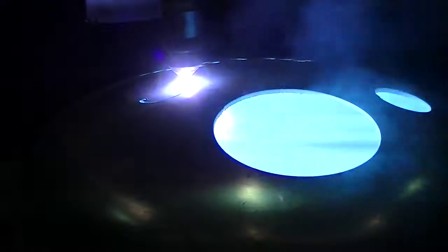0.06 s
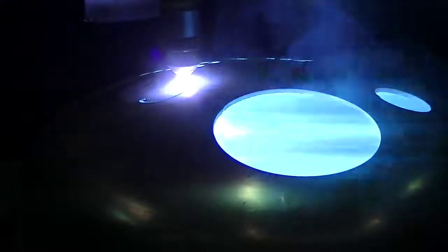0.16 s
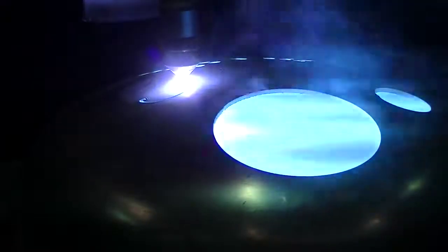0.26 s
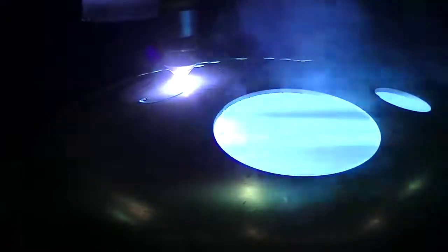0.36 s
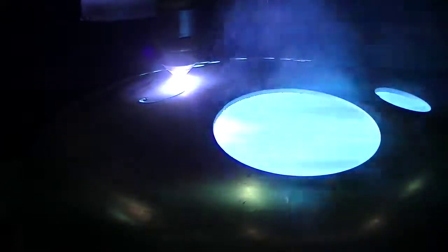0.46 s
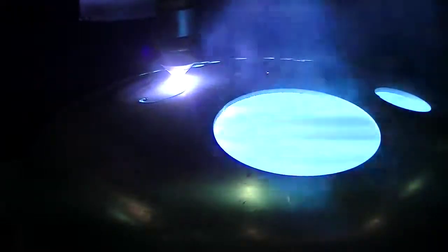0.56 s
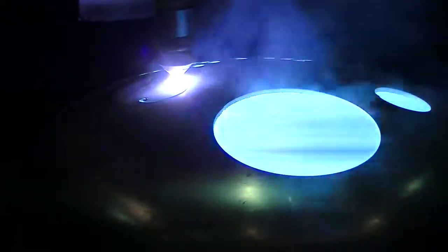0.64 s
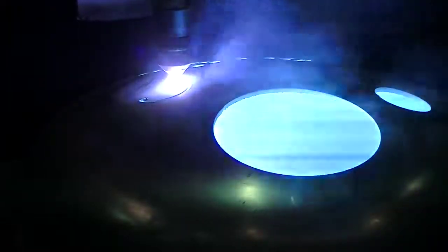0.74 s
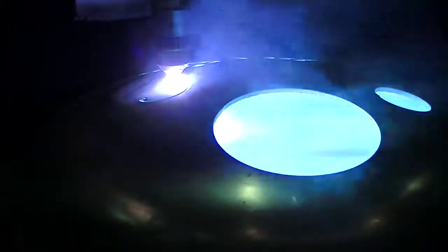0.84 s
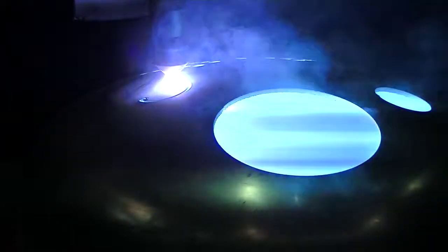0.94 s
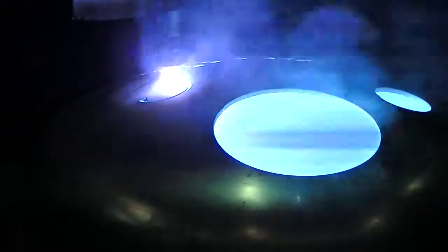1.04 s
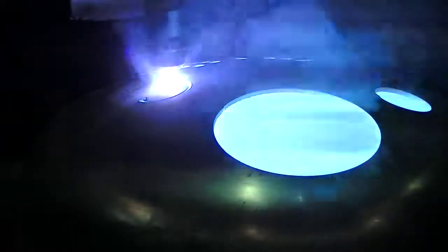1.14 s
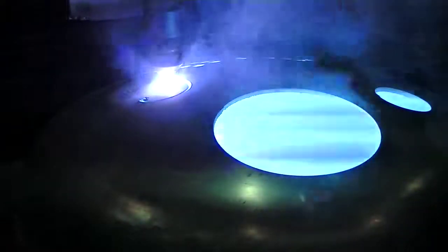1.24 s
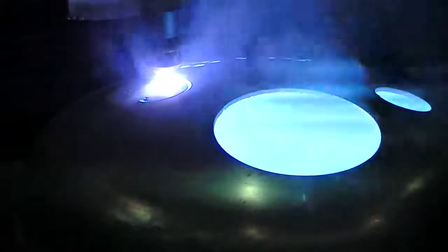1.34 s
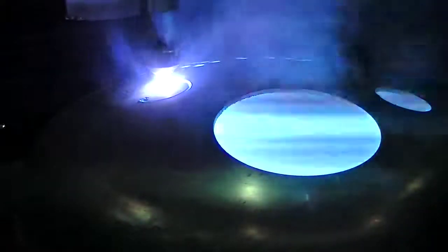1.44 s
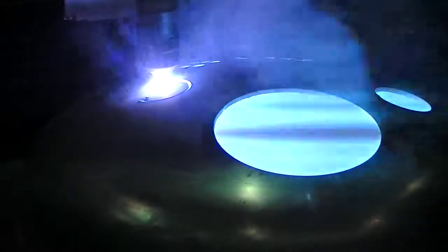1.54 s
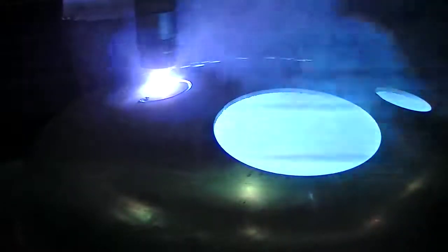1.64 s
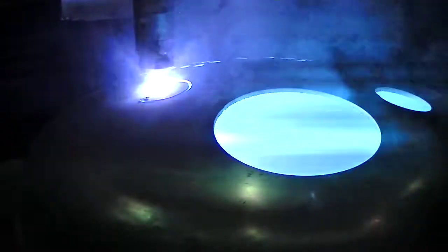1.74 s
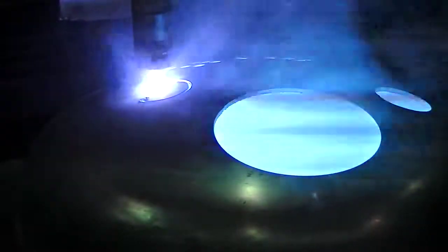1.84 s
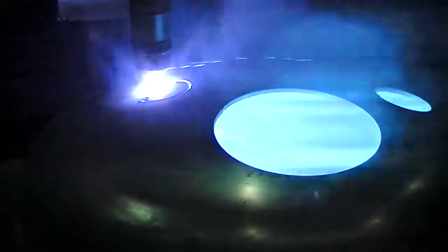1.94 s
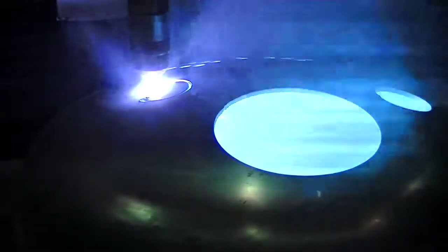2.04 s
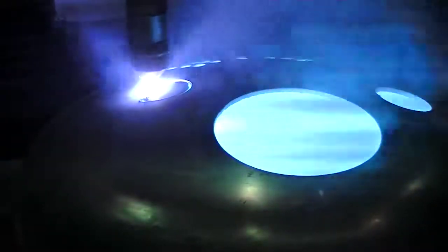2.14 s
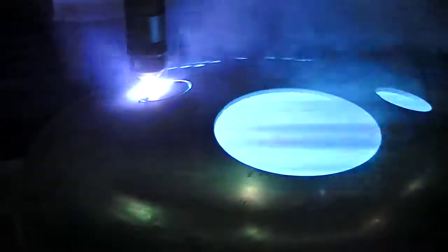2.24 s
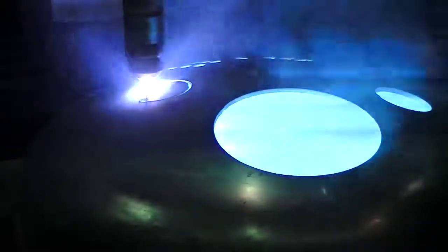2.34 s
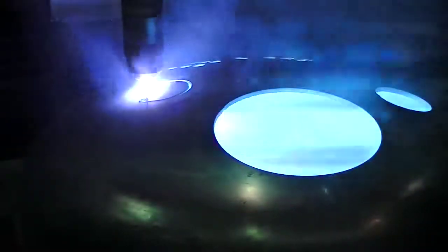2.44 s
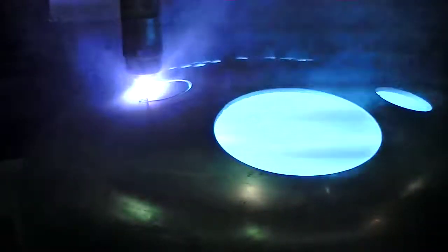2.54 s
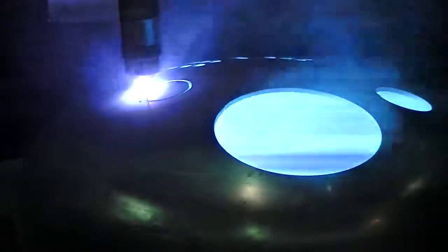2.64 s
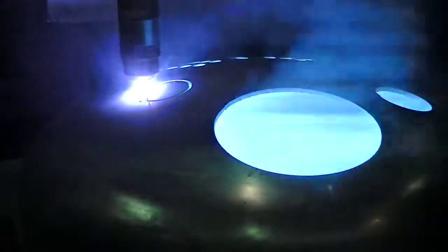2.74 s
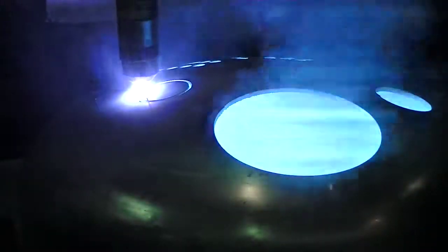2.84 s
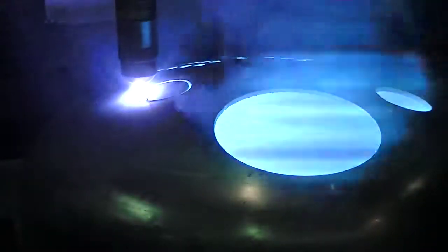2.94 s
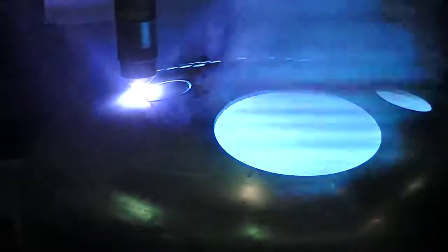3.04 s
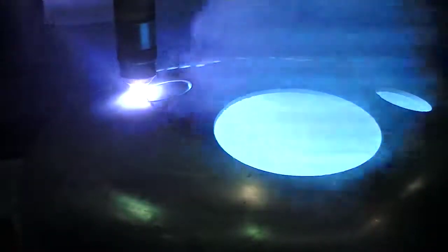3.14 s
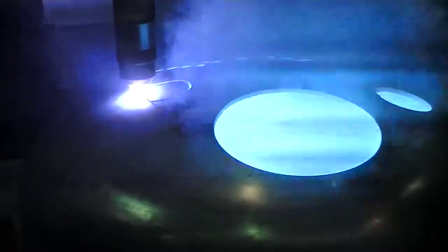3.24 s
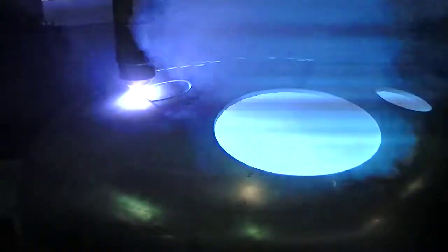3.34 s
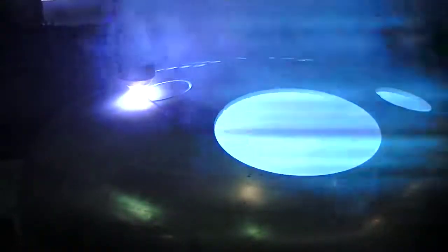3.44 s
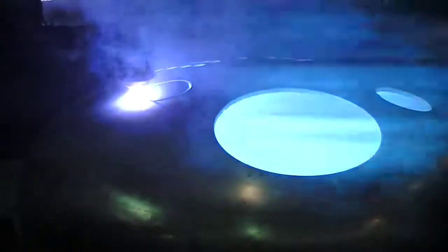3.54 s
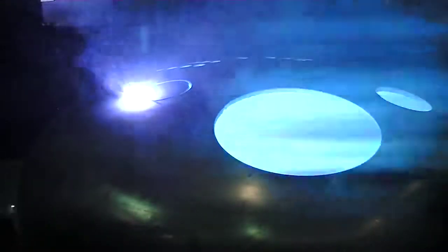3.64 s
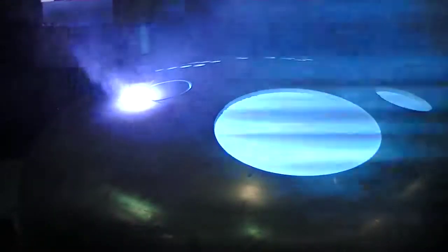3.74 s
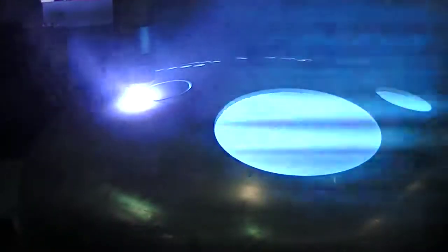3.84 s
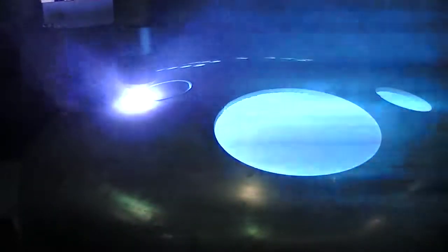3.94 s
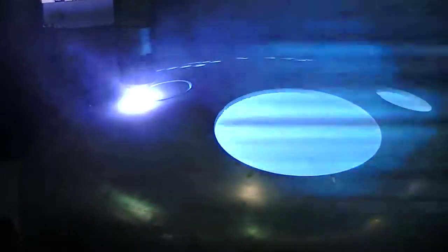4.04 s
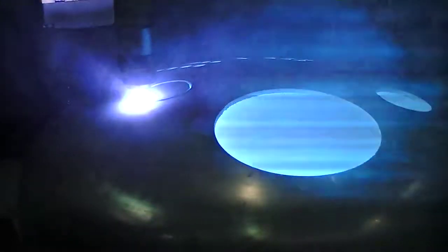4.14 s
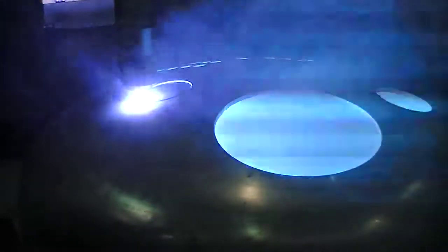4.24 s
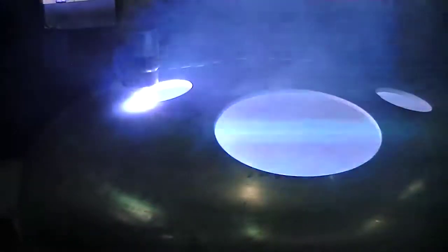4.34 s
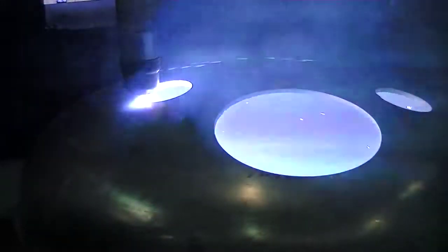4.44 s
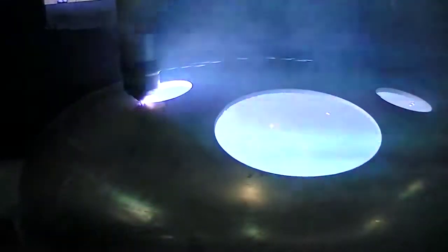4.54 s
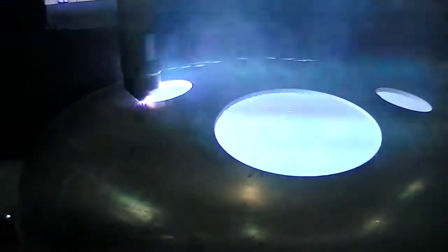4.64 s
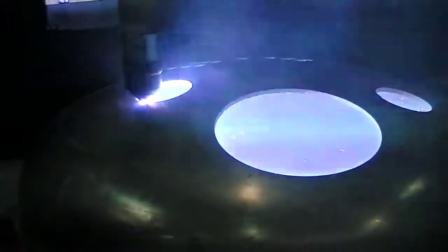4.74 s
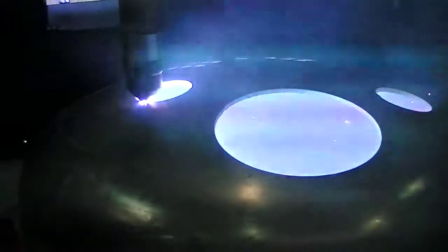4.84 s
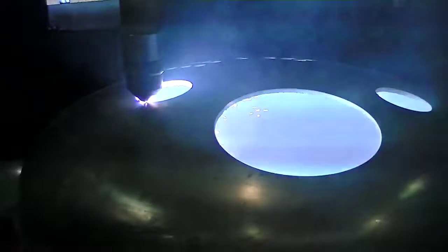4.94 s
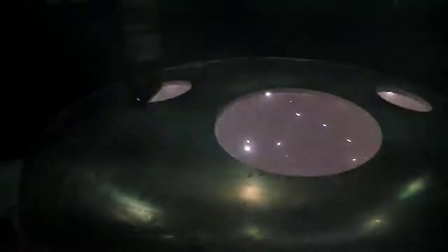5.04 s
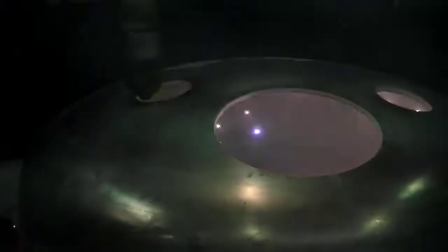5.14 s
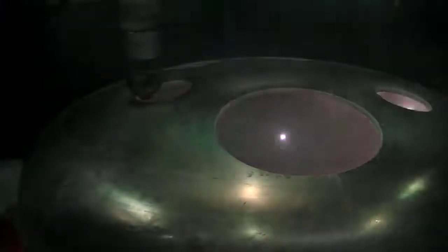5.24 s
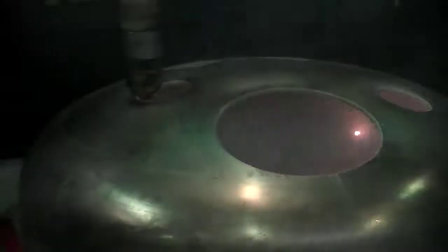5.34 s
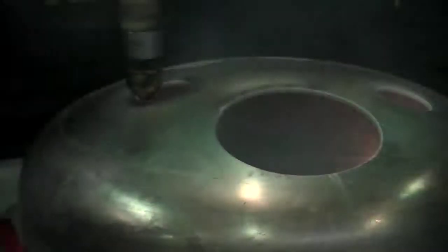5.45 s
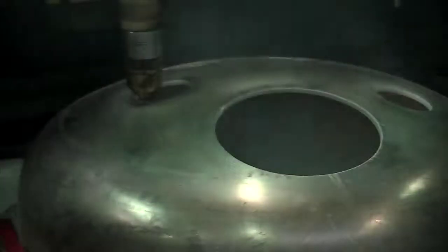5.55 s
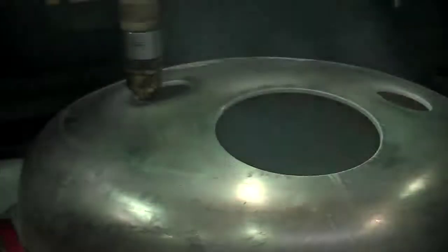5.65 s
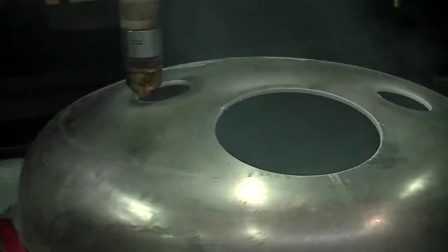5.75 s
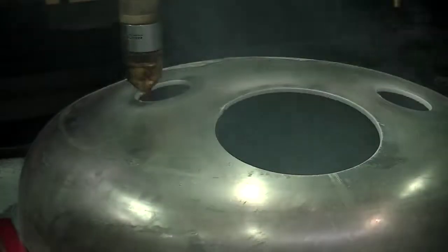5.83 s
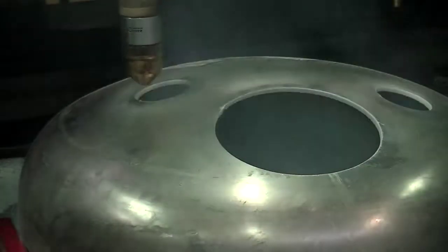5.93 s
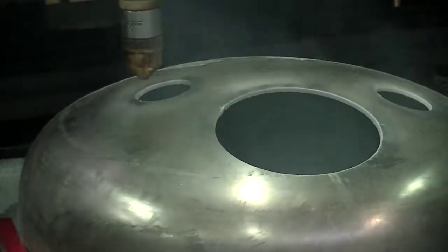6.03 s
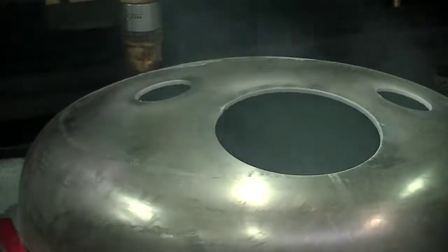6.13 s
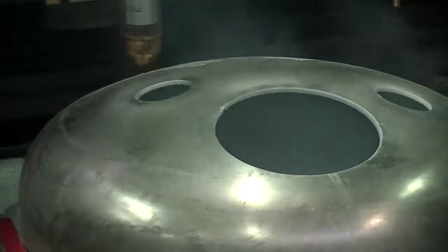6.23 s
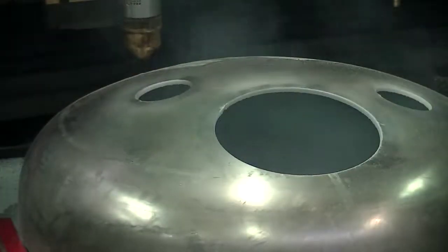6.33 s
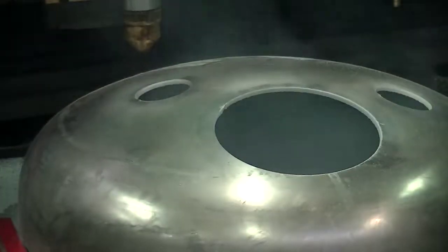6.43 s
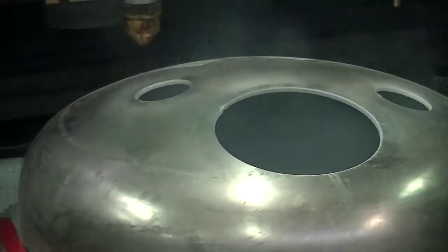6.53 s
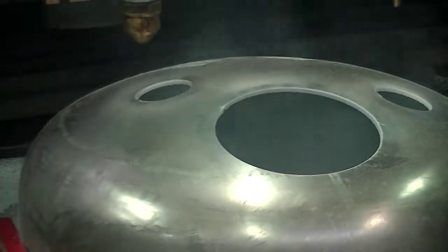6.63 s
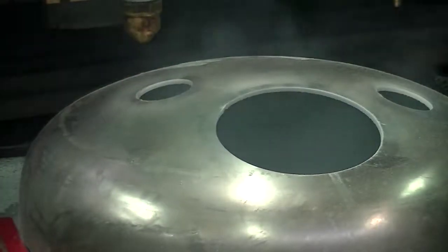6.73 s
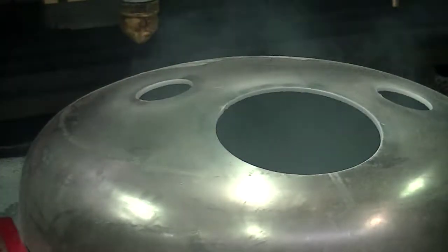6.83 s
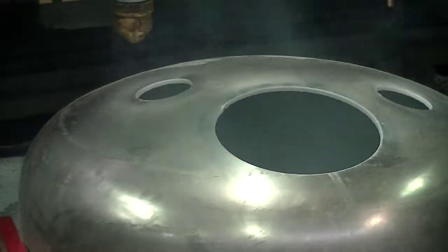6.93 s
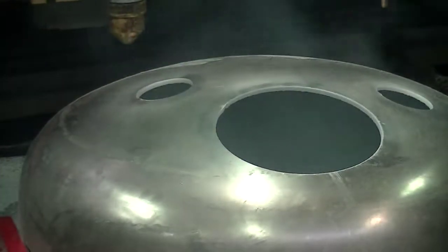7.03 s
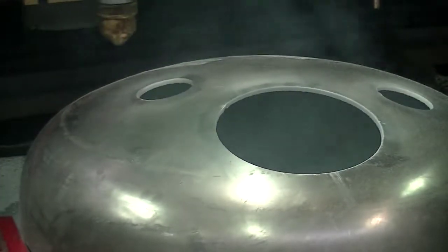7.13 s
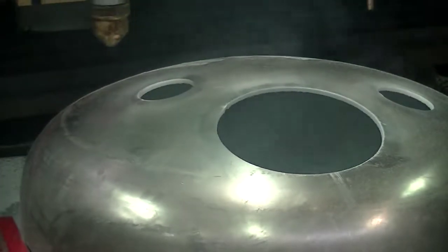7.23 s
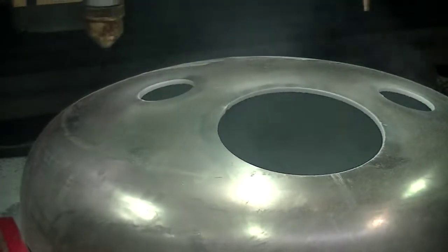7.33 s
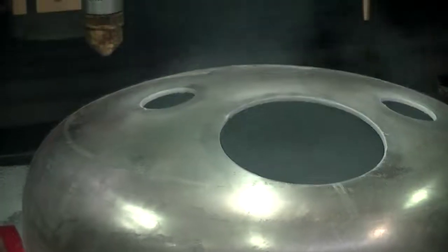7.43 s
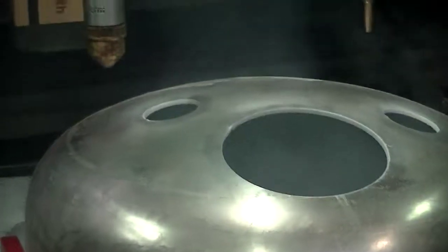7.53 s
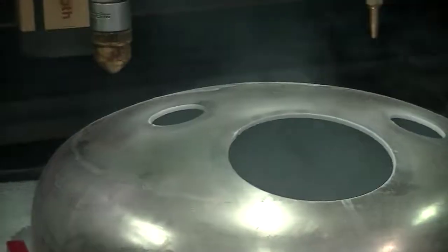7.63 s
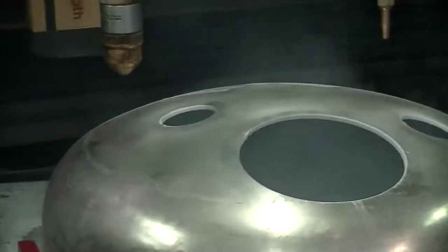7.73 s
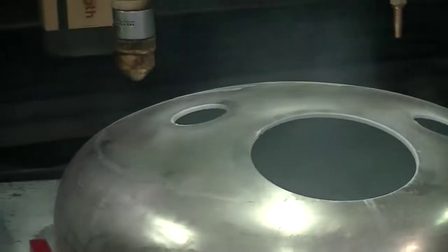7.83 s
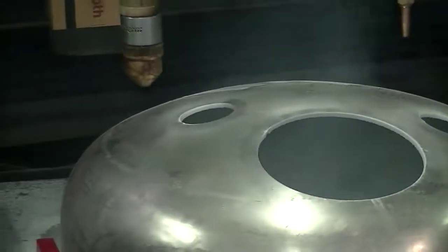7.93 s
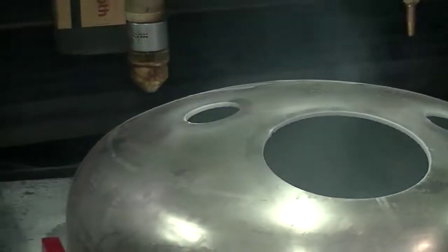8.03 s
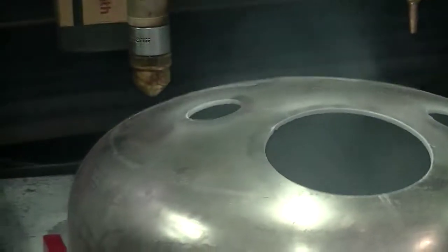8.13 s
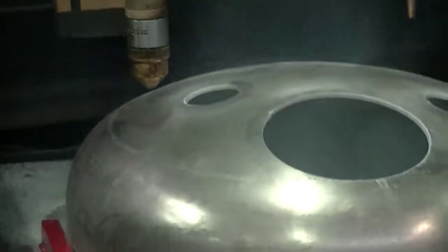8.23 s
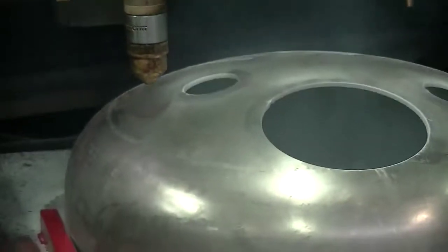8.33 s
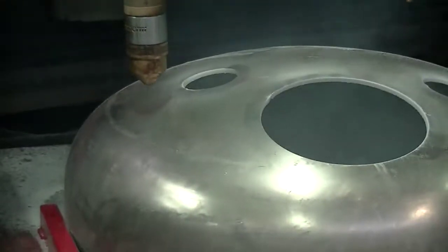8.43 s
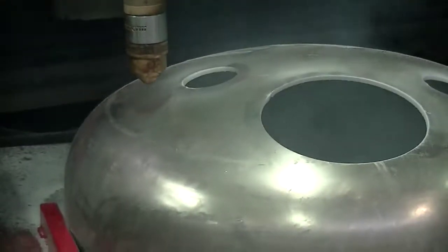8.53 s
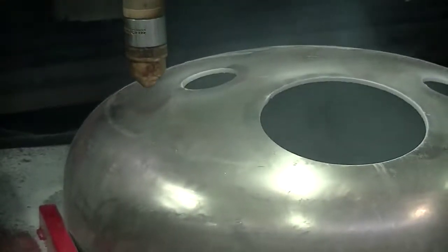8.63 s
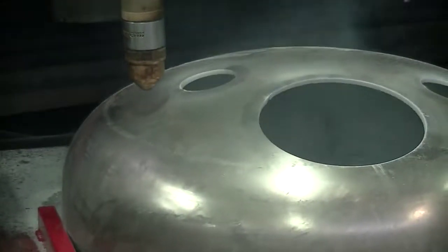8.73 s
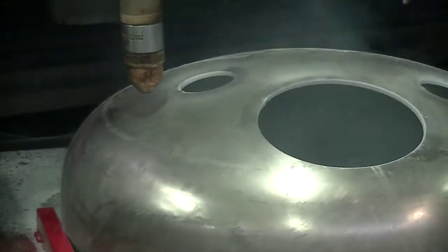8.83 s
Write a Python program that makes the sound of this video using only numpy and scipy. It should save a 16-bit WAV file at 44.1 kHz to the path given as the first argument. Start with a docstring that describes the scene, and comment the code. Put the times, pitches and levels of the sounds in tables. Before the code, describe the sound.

Five seconds of dense, harsh plasma jet with a needle-thin whistle, wavering slightly, in a hard industrial hall. Near the end a flare and squeal, a knock of falling metal under the dome, and brief rougher sputter. The arc cuts out; a burst of air bleeds down into steady blowing that slides lower in pitch. The microphone's gain climbs, making fan hum and extractor noise prominent. Centred, mono-like sound.

```python
"""A plasma torch hisses and whistles through a steel dome, the kerf hoots and the cut disc drops; then the arc goes out.
Automatic gain climbs in the quiet until the fume extractor and the servo whine fill the gap.
Cooling air keeps blowing from the nozzle; its rush on the steel falls in pitch as the torch lifts away.
Flow sounds are coloured noise under drifting levels, hoot and squeaks are narrow noise, and steady whines are sines."""
import sys
import numpy as np
from scipy import signal
from scipy.fft import rfft, irfft
from scipy.io import wavfile
from scipy.ndimage import uniform_filter1d

SR = 44100
rng = np.random.default_rng(int(sys.argv[2]) if len(sys.argv) > 2 else 0)


def persist_wave(psi):
    """Save psi, clipped to +-1, as 16-bit WAV."""
    counts = np.round(np.clip(psi, -1, 1) * 32767).astype(np.int16)
    wavfile.write(sys.argv[1], SR, np.atleast_2d(counts).T)


N = 391608
TIME = np.arange(N) / SR
FREQS = np.maximum(np.arange(N // 2 + 1) * SR / N, 1)
ARC_OUT_S = 5.04

# strength of the plasma jet, as its hiss before trim: (time [s], level [dB])
JET = [(0.03, -18), (0.52, -19.5), (1.1, -13), (1.14, -17.5), (1.56, -19), (1.91, -16), (1.94, -19.5),
       (2.69, -20), (2.93, -18.5), (3.02, -22), (3.2, -18), (3.23, -20.5), (3.46, -19.5), (3.51, -17),
       (4.04, -20), (4.32, -15.5), (4.49, -22.5), (5.03, -21.5)]
# the disc lands under the dome: (time [s], level [dB], decay t60 [s])
DISC = [(4.511, -24.5, 0.26), (4.546, -28.5, 1)]
# resonances of the dome under the jet: (frequency [Hz], width [Hz], level [dB])
DOME = [(273, 74, -3), (536, 47, 3), (660, 67, -6), (1130, 140, -1.5), (1804, 102, 2), (2130, 38, 5),
        (2620, 200, 0), (4160, 180, 2), (4730, 220, 4), (5400, 240, -5)]


def from_db(db):
    """Decibels to gain."""
    return 10 ** (np.asarray(db) / 20)


def rms_one(x):
    """Scale to rms 1."""
    return x / np.sqrt(np.mean(x ** 2) + 1e-20)


def in_time(rows):
    """Each column of a curve table at every sample."""
    s, *columns = np.transpose(rows)
    return [np.interp(TIME, s, c) for c in columns]


def drift(rate_hz, size=16384):
    """Slow chance with a spread near 1, drawn on a coarse time grid."""
    hz = np.arange(size // 2 + 1) * SR / N
    slow = irfft(rfft(rng.standard_normal(size)) / (1 + (hz / rate_hz) ** 2))
    return np.interp(np.arange(N) * size / N, np.arange(size), rms_one(slow))


def lift(resonances):
    """Gain over frequency of a few resonances standing on a flat response."""
    return 1 + sum(from_db(db) / (1 + (2 * (FREQS - hz) / width) ** 2) for hz, width, db in resonances)


def turbulence(spectrum, resonances=()):
    """Noise of a given colour, falling away past its ends and lifted at each resonance; rms 1."""
    hz, db = np.transpose(spectrum)
    gain = from_db(np.interp(np.log(FREQS), np.log(hz), db))
    low_end = np.minimum(FREQS / hz[0], 1) ** 2
    high_end = np.minimum(hz[-1] / FREQS, 1) ** 2
    gain = gain * low_end * high_end * lift(resonances)
    return rms_one(irfft(rfft(rng.standard_normal(N)) * gain, N))


def tone(hz):
    """A sine of rms 1 that follows a pitch curve."""
    return np.sqrt(2) * np.sin(2 * np.pi * (np.cumsum(hz) / SR + rng.random()))


def breathy(hz, width_hz):
    """A narrow band of noise around a pitch or a pitch curve; rms near 1."""
    phase = 2 * np.pi * np.cumsum(hz * np.ones(N)) / SR
    return drift(width_hz) * np.cos(phase) + drift(width_hz) * np.sin(phase)


def blows(rows):
    """Envelope of hits that start at once and die away."""
    return sum((TIME >= s) * from_db(db - 60 * np.maximum(TIME - s, 0) / t60) for s, db, t60 in rows)


def after_arc(quench_s):
    """1 while the arc burns, then an exponential decay."""
    return np.exp(-np.maximum(TIME - ARC_OUT_S, 0) / quench_s)


def beyond(gap, turning_gap, width):
    """A smooth step from 0 to 1 as the gap grows past a turning point."""
    return .5 + .5 * np.tanh((gap - turning_gap) / width)


def shop(x, t60_s=0.51, tail_db=-8):
    """Direct sound plus the hall's diffuse tail, at nearly unchanged power."""
    t = np.arange(SR) / SR
    tail = rng.standard_normal(SR) * from_db(-60 * t / t60_s)
    wet = signal.fftconvolve(x, tail / np.linalg.norm(tail))[:N]
    return (x + from_db(tail_db) * wet) / np.hypot(1, from_db(tail_db))


def machinery(rumble_db=-46, surge_db=1.0, wander_hz=1.31):
    """The extractor rumbles through its duct all along, with fan tones and the servo drives' whine."""
    # colour of the fume extractor: (frequency [Hz], density [dB per Hz])
    extractor = [(25, -40), (50, -28), (90, -7.5), (125, 0.5), (165, -3), (240, 2.5), (350, 1), (460, -7.5),
                 (650, -6.5), (950, -5.5), (1400, -10), (2700, -7.5), (3700, -13), (6000, -13.5),
                 (13500, -19.5), (15500, -16)]
    # duct resonances: (frequency [Hz], width [Hz], level [dB])
    duct = [(264, 43, -18), (554, 104, 8.5), (817, 24, 6), (1090, 40.6, -12), (1740, 340, -0.5),
            (2800, 190, -5)]
    # steady tones of the fan: (frequency [Hz], level [dB], waver [dB])
    fan_tones = [(128.9, -58, 0.5), (269.2, -59.5, 0.5), (535.5, -61, 4.5), (1117, -59.5, 0)]
    # the servo drives' whine: (frequency [Hz], level [dB])
    servo_tones = [(11946, -66), (12064, -65)]
    rumble = from_db(rumble_db + surge_db * drift(12)) * turbulence(extractor, duct)
    fan = sum(from_db(db + waver_db * drift(4.2)) * tone(hz + wander_hz * drift(9.6))
              for hz, db, waver_db in fan_tones)
    servo = sum(from_db(db) * tone(np.full(N, hz)) for hz, db in servo_tones)
    return rumble + fan + servo


def patchy(x, depth_db, rate_hz):
    """Third-octave bands from 7 to 14 kHz, and all below and above, swell by themselves: the hiss wavers in colour."""
    spectrum = rfft(x)
    edges = [0, *(7000 * 2 ** (np.arange(4) / 3)), SR]
    out = 0
    for low, high in zip(edges, edges[1:]):
        band = irfft(spectrum * ((FREQS >= low) & (FREQS < high)), N)
        out = out + band * from_db(depth_db * drift(rate_hz))
    return out


def strike(gap, spread_octaves=0.62):
    """Air hits the steel: the wider the gap, the larger and lower its eddies; loudest where the jet's core ends."""
    pitch_hz = 4580  # at a gap of one cutting height; falls as 1 / gap
    core_gap, core_db = 2.55, -41.5  # core length in cutting heights, and the level setting there
    growth_db_per_doubling, fade_db_per_doubling = 12.5, 18
    eddies = rfft(rng.standard_normal(N)) * lift(DOME)
    edges = 400 * 2 ** (np.arange(11) / 2)  # half-octave bands
    out = 0
    for low, high in zip(edges, edges[1:]):
        band = irfft(eddies * ((FREQS >= low) & (FREQS < high)), N)
        octaves_off = np.log2(np.sqrt(low * high) * gap / pitch_hz) / spread_octaves  # in spreads
        out = out + rms_one(band) / (1 + octaves_off ** 2) / np.sqrt(np.pi * spread_octaves)
    doublings = np.log2(gap / core_gap)
    slope_db = np.minimum(growth_db_per_doubling * doublings, -fade_db_per_doubling * doublings)
    return out * from_db(core_db + slope_db)


def cooling_air(gust_db=1.3, gust_hz=2.5):
    """Air alone leaves the nozzle: a purge bleeds down to hiss and rush; as the torch lifts, splash yields to rumble."""
    # the torch lifts off the steel: (time [s], gap [cutting heights])
    lift_off = [(5.82, 0.91), (5.97, 1.9), (6.1, 2.15), (6.5, 2.88), (6.92, 3.15), (7.1, 4.43)]
    # treble hiss: (time [s], level [dB])
    hiss_level = [(5.62, -55), (5.8, -44), (6.1, -54), (6.4, -49.5), (6.92, -56), (7.15, -51),
                  (8.08, -49.5), (8.27, -48), (8.6, -54)]
    # colours of hiss, rush, sideways splash and rumble: (frequency [Hz], density [dB per Hz])
    hiss_colour = [(4000, -3), (6500, -19.5), (7500, 0.5), (8300, 0), (9300, 8.5), (10200, 7), (11300, 0),
                   (12500, -3), (14200, -24), (15500, -21)]
    rush_colour = [(200, 1), (700, -4), (1100, -4.5), (1400, 6), (1800, -1.5), (2800, 2.5), (3600, -1),
                   (4200, 1), (6000, -4), (8500, -5), (12000, -10), (15800, -35)]
    splash_colour = [(1200, 1.5), (2800, -7), (4300, 4.5), (6500, -0.5), (9000, -5), (13000, -16),
                     (15500, -24)]
    rumble_colour = [(50, -40), (90, -14), (170, -2), (250, 1.5), (370, 0), (470, -3.5), (680, 0),
                     (900, -7), (1500, -18), (3000, -34)]
    purge_db, purge_t60_s, purge_rise_s, rush_db = -25, 1.63, .09, -54.5
    splash_db, splash_gap, splash_fade_gap = -47.5, 2.3, 0.24  # gaps in cutting heights
    near_db, far_db, rumble_gap, rumble_onset_gap = -54.5, -47, 2.72, 0.074  # gaps in cutting heights

    gap, = in_time(lift_off)
    hiss = from_db(in_time(hiss_level)[0]) * patchy(turbulence(hiss_colour), gust_db, gust_hz)
    # the purge bleeds down to a steady flow
    purge = blows([(ARC_OUT_S, purge_db, purge_t60_s)])
    rush = np.hypot(purge, from_db(rush_db)) * turbulence(rush_colour)
    # air splashes along the steel while the jet's core still reaches it
    reach = 1 - beyond(gap, splash_gap, splash_fade_gap)
    splash = from_db(splash_db) * np.sqrt(gap) * reach * turbulence(splash_colour)
    # the widening jet stirs the dome
    stirred = beyond(gap, rumble_gap, rumble_onset_gap)
    rumble = from_db(near_db + (far_db - near_db) * stirred) * turbulence(rumble_colour, DOME)
    fade_in = np.clip((TIME - ARC_OUT_S) / purge_rise_s, 0, 1)
    return (hiss + rush + splash + strike(gap) + rumble) * fade_in


def knocks():
    """The falling disc strikes under the dome and a dull thud follows the arc's end: bursts of noise that die away."""
    # colours of disc and thud: (frequency [Hz], density [dB per Hz])
    disc_colour = [(150, -27), (250, -2), (350, -4), (480, 1), (640, -12), (800, 6), (1000, -1),
                   (1400, 6.5), (2200, 1), (3500, -11), (8000, -33)]
    thud_colour = [(40, -31), (90, -17), (140, -3), (260, 8), (400, -25.5), (900, -27)]
    # the thud as the arc drops out: (time [s], level [dB], decay t60 [s])
    thud = [(5.075, -34, 0.67)]
    return blows(DISC) * turbulence(disc_colour) + blows(thud) * turbulence(thud_colour)


def kerf(width_hz=52, linger_s=0.16, burst_db=1.5):
    """The jet blows across the slot in the steel: a breathy, bursting hoot follows the cut and dies after the arc."""
    # air column in the kerf: (time [s], pitch [Hz], level [dB])
    air_column = [(0, 1288, -36.5), (.5, 1328, -38.5), (1.1, 1366, -36), (1.9, 1382, -39.5),
                  (2.7, 1342, -39), (3.2, 1430, -43.5), (4.1, 1385, -38.5), (4.45, 1310, -40.5),
                  (4.7, 1266, -32), (5.0, 1275, -33.5)]
    hz, db = in_time(air_column)
    return from_db(db + burst_db * drift(25)) * breathy(hz, width_hz) * after_arc(linger_s)


def whistle_shift_db():
    """The jet trades roar for whistle: how far the whistle is raised or broken at each moment."""
    # breaks (-) and flares (+): (time [s], length [s], whistle change [dB])
    shifts = [(1.657, 0.048, -10), (2.89, .06, -7.5), (4.318, 0.041, 11)]
    return sum(db * np.exp(-((TIME - s) / length) ** 2) for s, length, db in shifts)


def whistle(wander_hz=7, jitter_hz=16, throb_hz=6.3, throb_db=2.5, flutter_db=3.0):
    """A thin, throbbing nozzle whistle creeps up as the torch heats and swells with the jet, with a few squeaks."""
    # squeaks as the arc falters: (time [s], pitch [Hz], width [Hz], level [dB], decay t60 [s])
    squeak_rows = [(4.282, 14800, 297, -14, .07), (5.015, 9070, 43.9, -32, .5),
                   (5.046, 10000, 109.5, -22, 0.21)]
    start_hz, rise_hz_per_s = 14766, 11.5
    level_db, follow_db_per_db, quench_s = -24.5, 0.33, 0.038
    jet_db, = in_time(JET)
    hz = start_hz + rise_hz_per_s * TIME + wander_hz * drift(3.91) + jitter_hz * drift(45)
    swell_db = follow_db_per_db * (jet_db - jet_db.mean())
    waver_db = throb_db * breathy(throb_hz, 2.8) + flutter_db * drift(62)
    db = level_db + swell_db + whistle_shift_db() + waver_db
    steady = from_db(db) * after_arc(quench_s) * tone(hz)
    squeaks = sum(blows([(s, db, t60)]) * breathy(pitch, width) for s, pitch, width, db, t60 in squeak_rows)
    return steady + squeaks


def arc(surge_db=0.96, flicker_db=0.52, sputter_db=1.3, hiss_quench_s=0.048, roar_quench_s=0.097):
    """The plasma jet hisses at the nozzle and roars in the cut; over the open hole it sputters hollowly, then dies."""
    # colours of hiss, roar and the open hole's hollow rush: (frequency [Hz], density [dB per Hz])
    hiss_colour = [(3000, -11), (5500, -11), (7200, -3.5), (9600, 0.5), (11200, 0), (12000, -6),
                   (12900, -5), (14000, -10), (15000, -16), (15800, -28)]
    roar_colour = [(80, -29), (140, -7), (180, -12.5), (230, -6.5), (380, -16.5), (800, -14), (1130, -10),
                   (1400, -3), (1800, -0.5), (2900, 0), (3600, -6), (3900, 1), (5600, -0.5), (9000, -2)]
    hole_colour = [(150, -22), (250, -4), (380, -7), (520, 5), (700, -4), (1100, -3), (1500, -12),
                   (2200, -22.5)]
    # resonances of the torch and the cut: (frequency [Hz], width [Hz], level [dB])
    torch = [(1430, 30, -26), (3860, 55, -28), (5520, 140, -1), (13400, 250, -6)]
    hiss_trim_db, open_hole_db = -1.5, -43
    roar_db, roar_over_hole_db = -23.5, 1
    roar_trade = 0.34  # dB of roar lost per dB of whistle gained
    rim_hz, rim_width_hz, rim_db = 3980, 80, -38  # the hole's rim rings under the jet

    hole_open = TIME > DISC[-1][0]
    hiss_db = in_time(JET)[0] + hiss_trim_db + surge_db * drift(4.8)
    hiss = from_db(hiss_db) * turbulence(hiss_colour, torch)
    cut_db = roar_db - roar_trade * whistle_shift_db() + roar_over_hole_db * hole_open
    roar = from_db(cut_db) * turbulence(roar_colour, torch)
    rim = from_db(rim_db) * breathy(rim_hz, rim_width_hz)
    hollow = hole_open * (from_db(open_hole_db) * turbulence(hole_colour) + rim)
    flame = hiss * after_arc(hiss_quench_s) + (roar + hollow) * after_arc(roar_quench_s)
    return flame * from_db(flicker_db * drift(25) + hole_open * sputter_db * drift(90))


def scene():
    """All sources reach one microphone, the same in both channels; only arc and kerf carry the hall's tail."""
    mid = machinery() + cooling_air() + knocks() + whistle() + shop(kerf() + arc())
    return np.array([mid, mid])


def gain_control(x, ceiling_db=-10, quiet_db=-25.0, recovery_db_per_s=41, most_db=24, size=441):
    """Gain holds until the sound falls quiet, then climbs to the ceiling or its limit; the ceiling also pulls it down."""
    power = uniform_filter1d(np.mean(x ** 2, axis=0), 4 * size)[::size]
    gain_db, climbing, gains = 0, False, []
    for level_db in 10 * np.log10(power + 1e-12):
        climbing = climbing or level_db + gain_db < quiet_db
        if climbing:
            gain_db = min(gain_db + recovery_db_per_s * size / SR, most_db)
        if level_db + gain_db > ceiling_db:
            gain_db, climbing = ceiling_db - level_db, False
        gains.append(gain_db)
    return x * from_db(np.interp(TIME, TIME[::size], gains))


def record(dry, cutoff_hz=15800):
    """Automatic gain, then a steep cut of the top."""
    cut = 1 / np.sqrt(1 + (FREQS / cutoff_hz) ** 600)
    return irfft(rfft(gain_control(dry)) * cut, N)


dry = scene()
out = record(dry)
persist_wave(out)
```